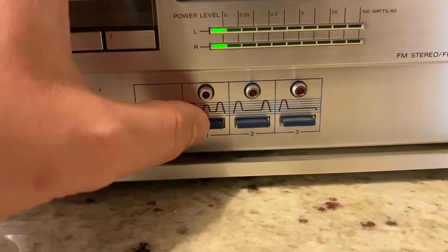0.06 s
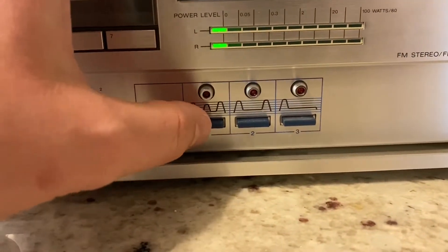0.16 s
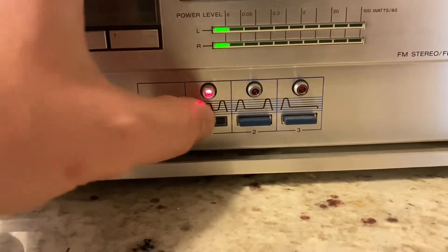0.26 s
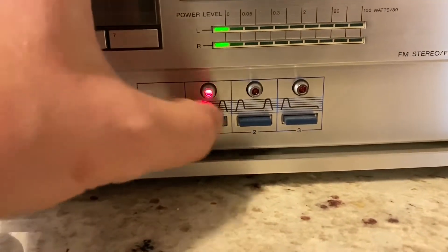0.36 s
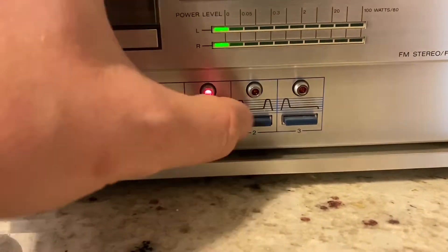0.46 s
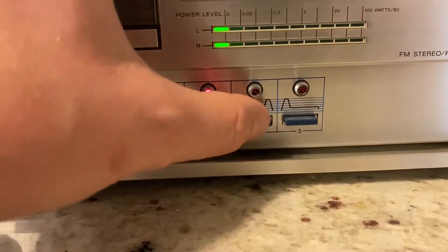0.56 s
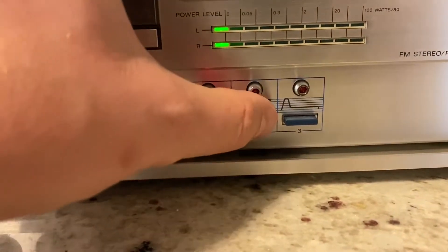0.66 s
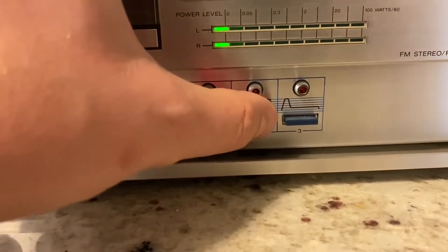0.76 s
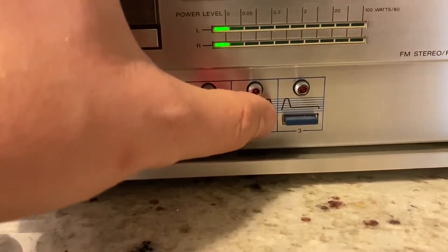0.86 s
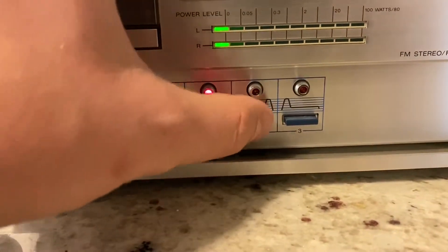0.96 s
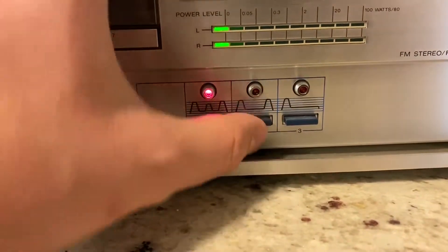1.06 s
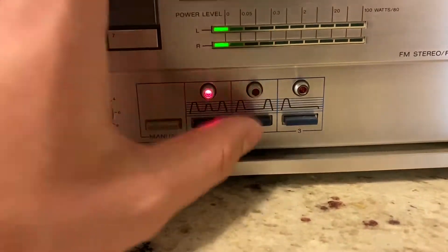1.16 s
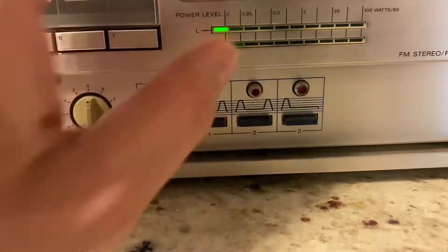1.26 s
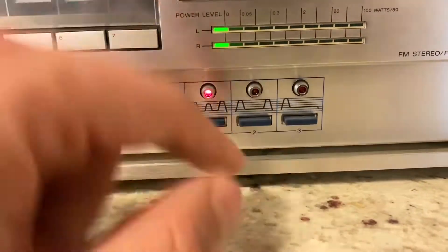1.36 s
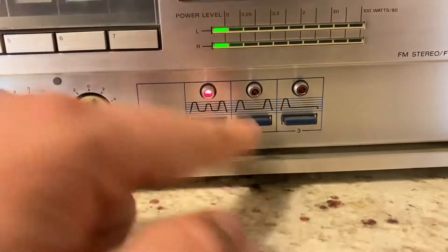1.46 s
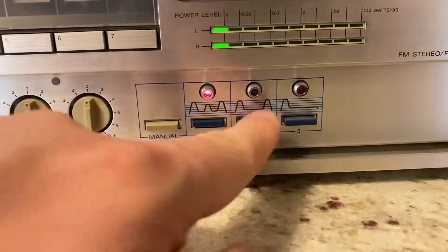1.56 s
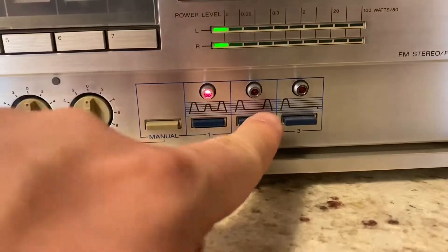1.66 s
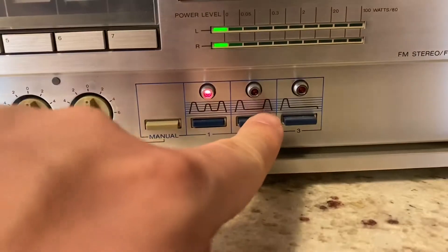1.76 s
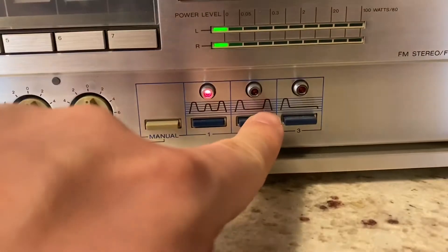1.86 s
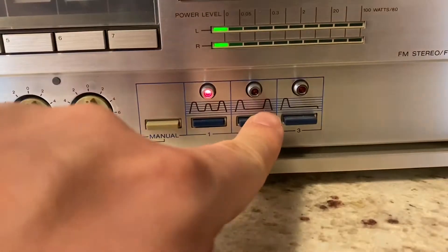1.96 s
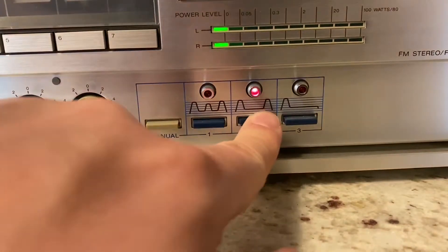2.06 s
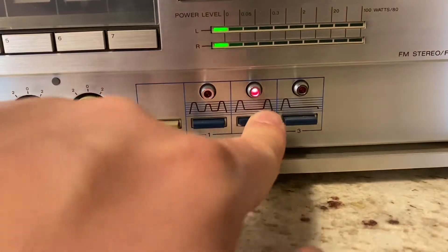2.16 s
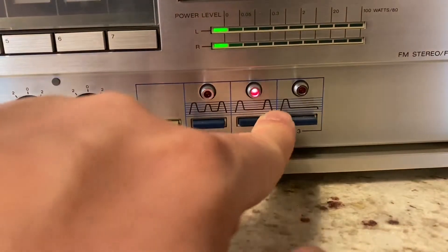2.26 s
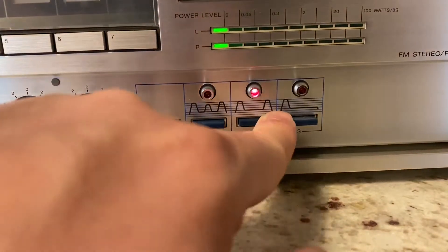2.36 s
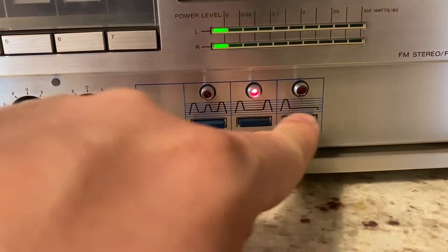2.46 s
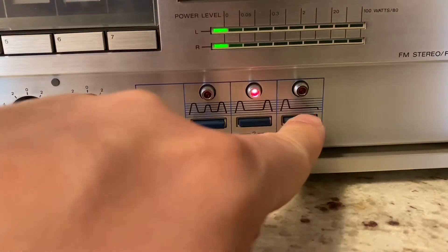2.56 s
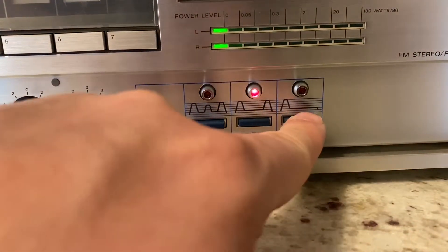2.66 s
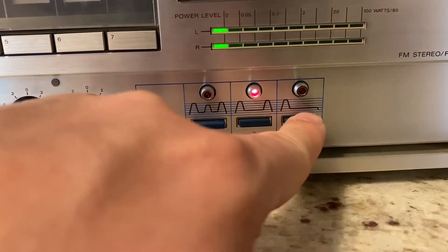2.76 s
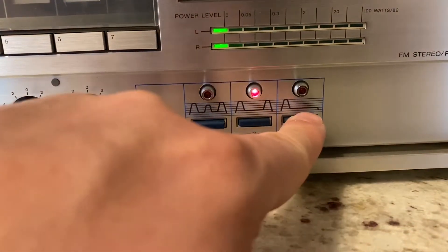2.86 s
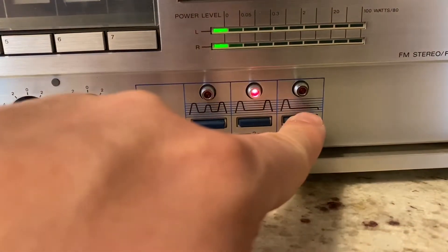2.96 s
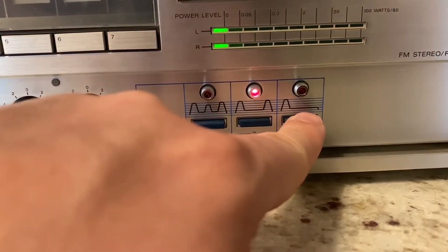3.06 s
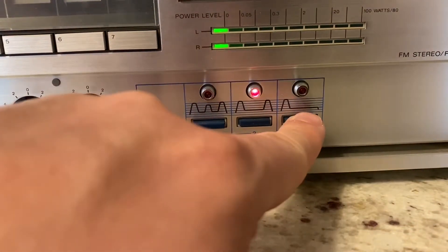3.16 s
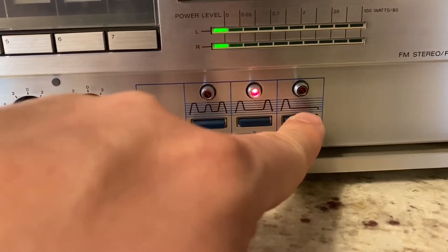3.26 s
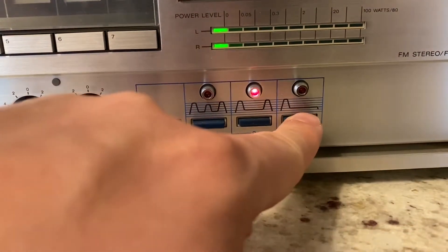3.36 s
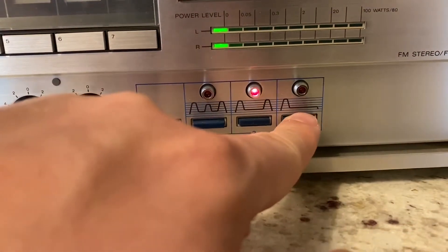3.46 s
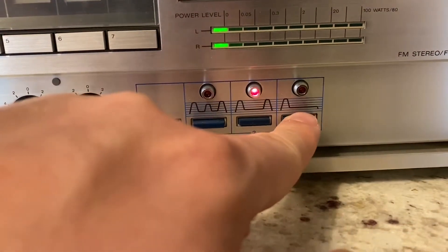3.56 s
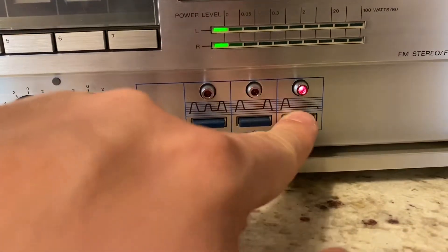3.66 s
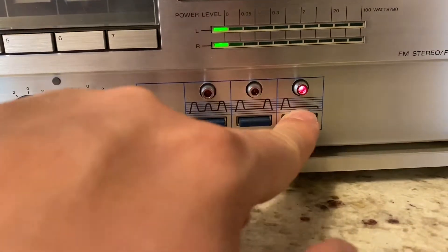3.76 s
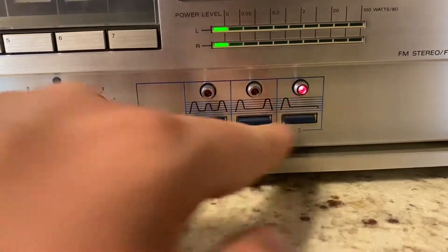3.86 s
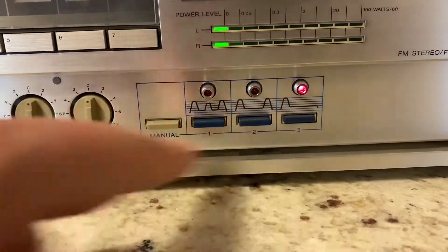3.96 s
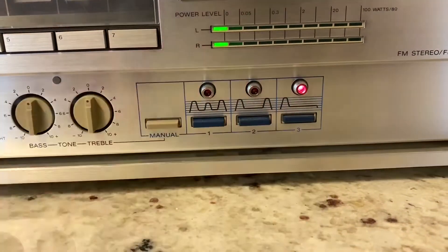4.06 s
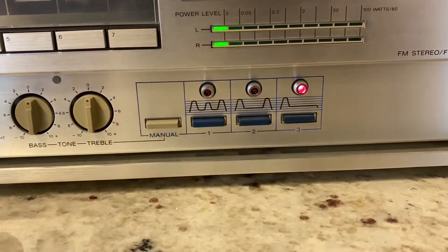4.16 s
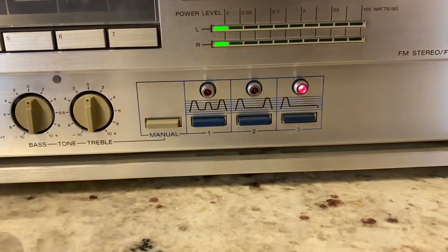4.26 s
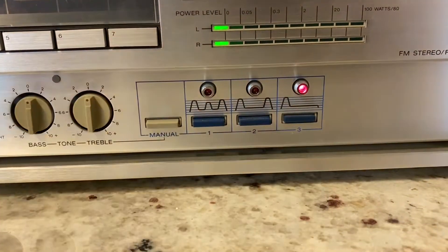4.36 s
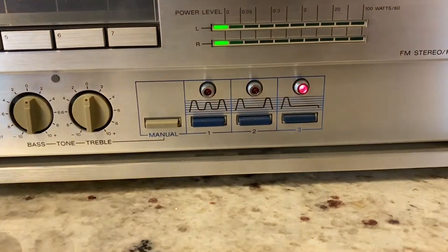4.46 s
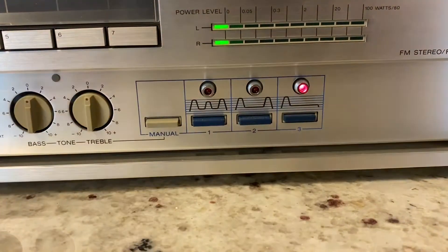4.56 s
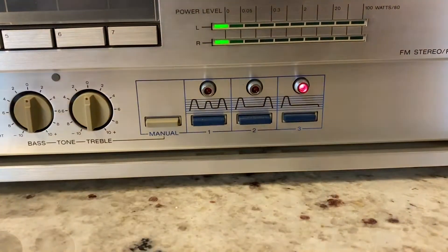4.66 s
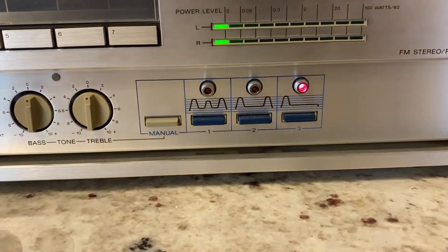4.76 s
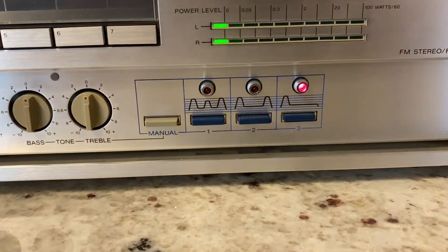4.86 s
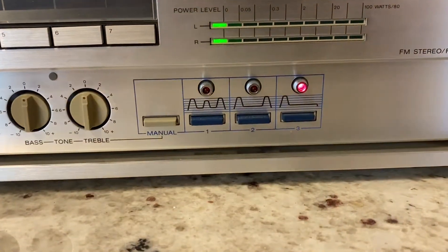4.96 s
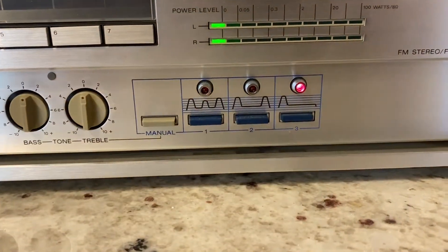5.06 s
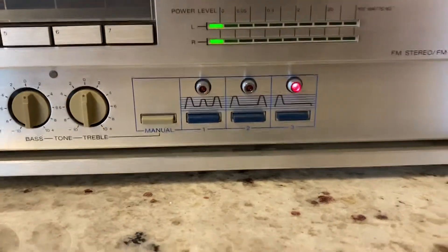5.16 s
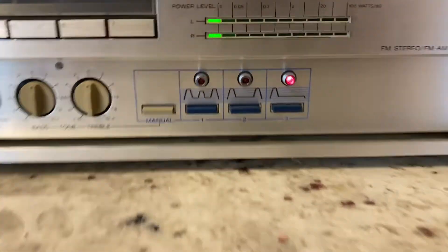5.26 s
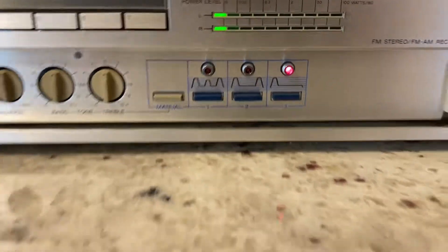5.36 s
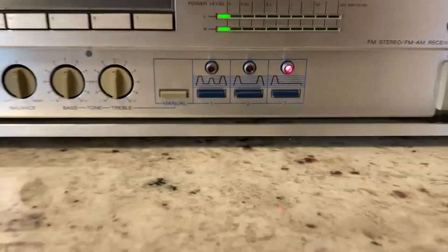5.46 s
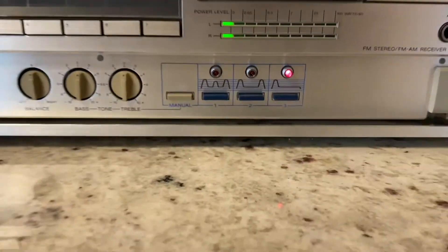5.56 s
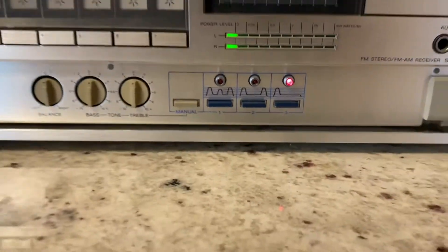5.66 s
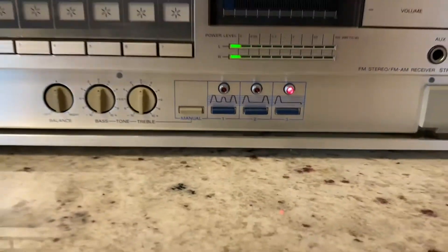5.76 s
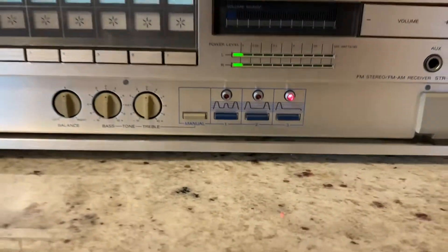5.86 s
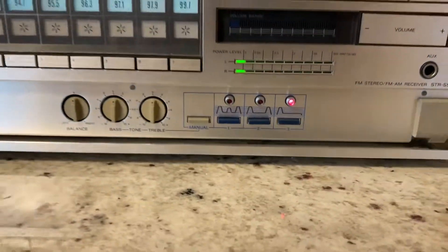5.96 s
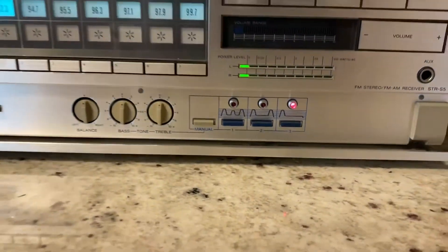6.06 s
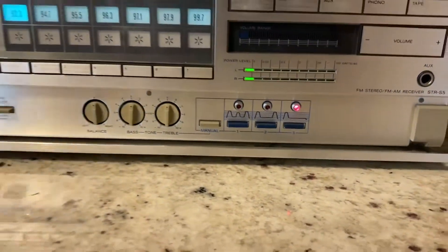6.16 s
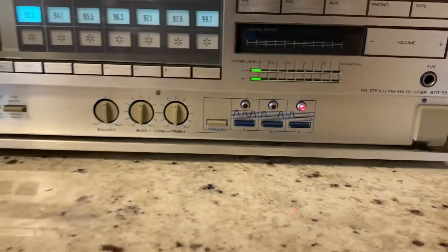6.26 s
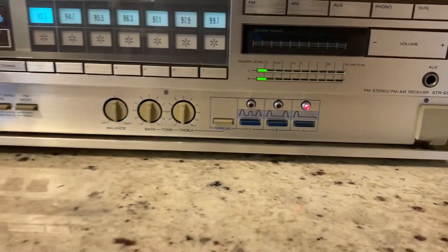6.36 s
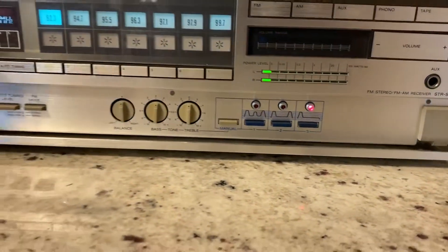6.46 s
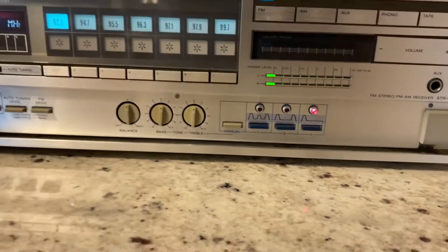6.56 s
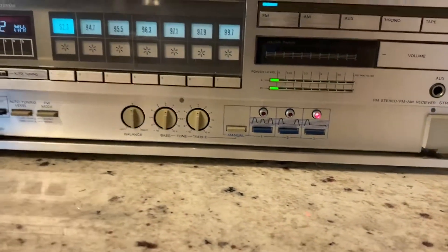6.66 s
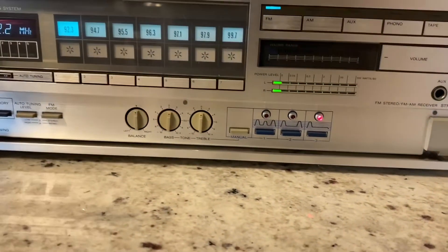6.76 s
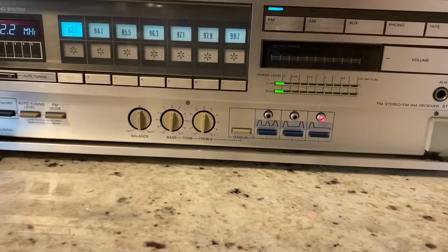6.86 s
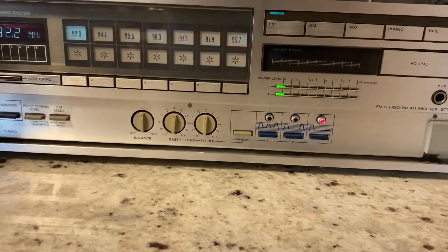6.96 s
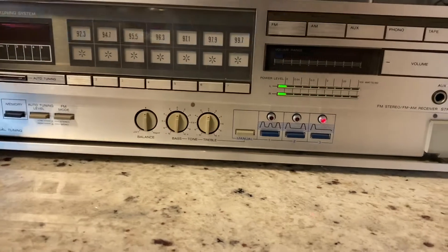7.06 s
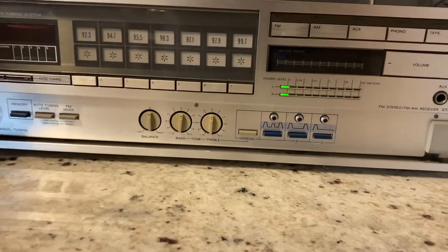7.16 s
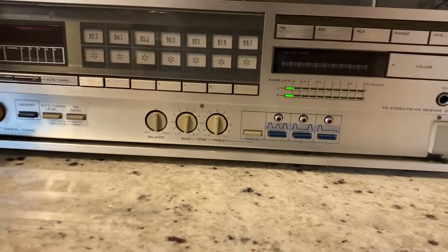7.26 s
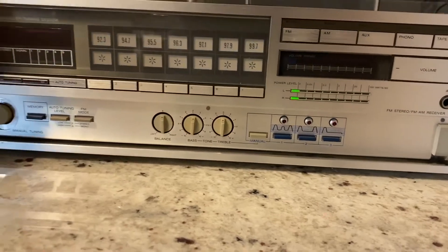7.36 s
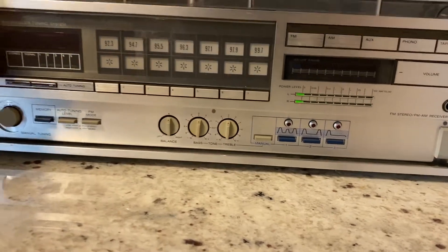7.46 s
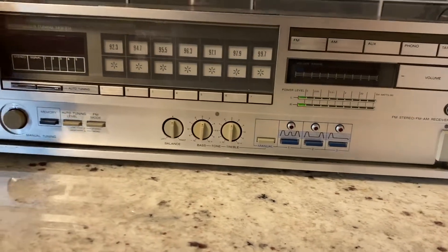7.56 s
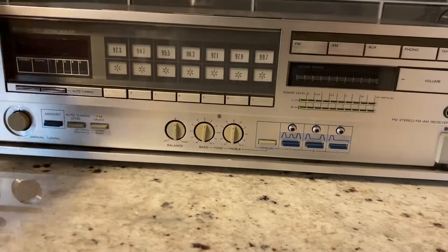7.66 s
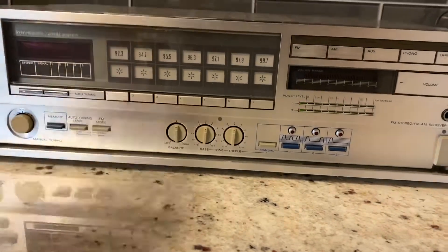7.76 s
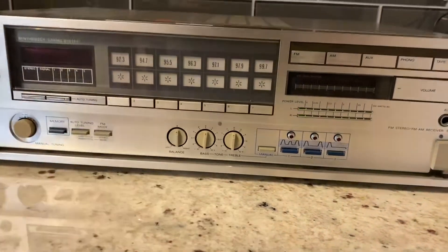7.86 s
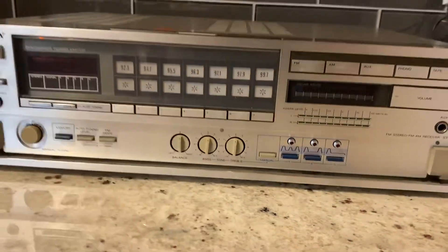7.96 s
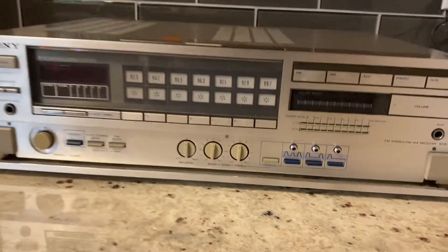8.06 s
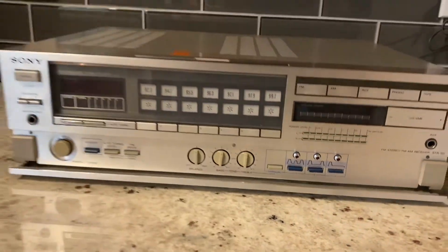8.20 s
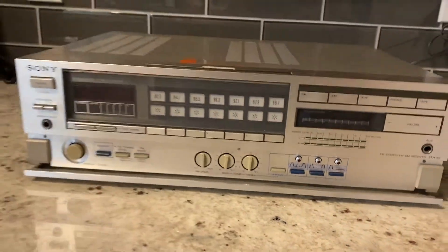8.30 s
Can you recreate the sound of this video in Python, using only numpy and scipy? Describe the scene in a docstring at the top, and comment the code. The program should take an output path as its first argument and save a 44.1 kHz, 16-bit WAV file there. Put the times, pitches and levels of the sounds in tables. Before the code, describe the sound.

Three loud, sharp latching button clicks on a metal panel in a quiet, hard kitchen, then a heavier power-switch clunk, with faint finger rustles.

```python
"""A quiet, hard kitchen: buttons on the metal front of a receiver are pressed, heard from a hand-held stereo microphone.
Latches, a power switch and small finger ticks are short noise bursts that set sine-like modes ringing;
decaying noise bands make the room's echoes. Skin and sleeve rustle as flickering noise and squeak as
resonances fed by random slips. The grip thumps softly, over a low rumble, room air and faint hiss."""
import sys
import numpy as np
from scipy import signal
from scipy.fft import rfft, irfft
from scipy.io import wavfile

SR = 44100
rng = np.random.default_rng(int(sys.argv[2]) if len(sys.argv) > 2 else 0)


def store_pcm(level_fs):
    """Save levels as 16-bit WAV."""
    pcm = np.round(np.clip(level_fs, -1, 1) * 32767).astype(np.int16)
    wavfile.write(sys.argv[1], SR, np.atleast_2d(pcm).T)


N = 367353  # length [samples]
TRAVEL_S = 0.02  # time kept ahead of each snap for the scrape of the cap [s]

# how alike left and right are in the background: (frequency [Hz], likeness [-1 to 1])
BACKGROUND_LIKENESS = [(30, 0.92), (70, .9), (150, 0.8), (400, .5), (1650, -0.76), (5000, .5),
                       (15000, 0.35)]
# balance of the rumble and air: (frequency [Hz], left minus right [dB])
BACKGROUND_BALANCE = [(60, -0.5), (240, 4), (950, 1.5), (3770, 3), (15000, -1)]


def from_db(db):
    """Turn decibels into a plain gain."""
    return 10 ** (np.asarray(db) / 20)


def rms_one(x):
    """Scale a sound to an average (rms) strength of 1."""
    return x / np.sqrt(np.mean(x ** 2) + 1e-20)


def in_time(rows):
    """Draw straight lines between timed rows, giving one curve per column."""
    s, *columns = np.transpose(rows)
    return [np.interp(np.arange(N) / SR, s, column) for column in columns]


def at_hz(points, hz):
    """Read a curve at any frequency, with straight lines on a log frequency scale."""
    point_hz, values = np.array(points)[:, 0], np.array(points)[:, 1]
    return np.interp(np.log(hz), np.log(point_hz), values)


def fft_hz(size):
    """Frequencies of a spectrum, kept at 1 Hz or more so their logarithm exists."""
    return np.maximum(np.fft.rfftfreq(size, 1 / SR), 1)


def drift(rate_hz):
    """Slow random wander, spread 1: noise through two equal low-pass steps at the given rate."""
    r = np.exp(-80 * np.pi * rate_hz / SR)  # one slow step lasts 40 samples
    noise = rng.standard_normal(N // 40 + 2002)
    slow = signal.lfilter([1], [1, -2 * r, r * r], noise)[2000:]
    return np.interp(np.arange(N) / 40, np.arange(len(slow)), rms_one(slow))


def ring(clicks, hz, t60, phase=0.):
    """A unit click sets a sine of height 1 ringing from the given phase, 60 dB weaker after t60 seconds."""
    r, w = from_db(-60 / (t60 * SR)), 2 * np.pi * hz / SR
    start = [np.sin(phase), r * np.sin(w - phase)]
    return signal.lfilter(start, [1, -2 * r * np.cos(w), r * r], clicks + 1e-18)


def coloured(spectrum, likeness, side_db=((20, 0), (20000, 0))):
    """Stereo noise of a given spectrum, left-right likeness and balance; rms 1."""
    hz = fft_hz(N)
    mid, side = rfft(rng.standard_normal((2, N)))
    alike = np.clip(at_hz(likeness, hz), -1, 1)
    pair = np.sqrt(1 + alike) * mid + np.sqrt(1 - alike) * side * [[1], [-1]]
    inside = (hz >= spectrum[0][0]) & (hz <= spectrum[-1][0])
    gain_db = at_hz(spectrum, hz) + at_hz(side_db, hz) * [[.5], [-.5]]
    return rms_one(irfft(pair * inside * from_db(gain_db), N))


def low_rumble():
    """Deep noise swells as the grip moves."""
    # strength of the rumble: (time [s], level [dB])
    rumble_level = [(0.0, -62.5), (0.37, -57.5), (0.6, -66), (1.14, -57.5), (1.23, -69), (1.37, -50.5),
                    (1.44, -62.5), (3.32, -65), (3.67, -56.5), (3.87, -63), (4.96, -64), (5.06, -56),
                    (5.68, -67), (6.94, -59), (7.38, -72), (8.33, -71.5)]
    # its colour: (frequency [Hz], relative level [dB per Hz])
    bass = [(12, -44.5), (20, -19.5), (36, -10.5), (54, 1.5), (86, -5), (119, -0.5), (150, -14), (205, -14),
            (220, -12), (290, -38.5), (480, -120)]
    return from_db(in_time(rumble_level)[0]) * coloured(bass, BACKGROUND_LIKENESS, BACKGROUND_BALANCE)


def room_air():
    """Steady room noise wavers slightly and sinks once the power is off, then recovers."""
    # strength before the wavering: (time [s], level [dB])
    air_level = [(0, -71.5), (6, -72), (7.1, -67.5), (7.35, -78), (8.33, -71)]
    # its colour: (frequency [Hz], relative level [dB per Hz])
    air = [(88, -34), (150, -8), (352, -8.5), (387, -16), (647, -18.5), (685, -20.5), (1000, -23),
           (1670, -28), (1980, -30), (5630, -42.5), (14000, -49.5)]
    level_db = in_time(air_level)[0] + 1.2 * drift(11.0)
    return from_db(level_db) * coloured(air, BACKGROUND_LIKENESS, BACKGROUND_BALANCE)


def patchy(x):
    """Half-octave bands swell and sink each in their own time."""
    spread_db, rate_hz = 3.5, 8.3
    spectrum, out = rfft(x), 0
    steps = np.clip(2 * np.log2(fft_hz(N) / 500), 0, 10)  # half octaves above 500 Hz
    for k in range(11):
        share = np.clip(1 - np.abs(steps - k), 0, 1)
        out = out + from_db(spread_db * drift(rate_hz)) * irfft(spectrum * share, N)
    return out


def rustle():
    """Skin and cloth slide in uneven, grainy strokes: a bright hiss over a duller rub."""
    # strokes, before they flicker: (time [s], length [s], bright hiss [dB], dull rub [dB])
    strokes = [(0.106, 0.065, -96, -68), (0.273, 0.05, -81, -56), (0.527, 0.073, -94.5, -78),
               (0.905, 0.12, -71.5, -67.5), (0.949, 0.19, -68, -61.5), (1.085, 0.25, -74.5, -81),
               (1.278, 0.14, -60.5, -69), (1.332, 0.26, -79.5, -93), (1.927, .03, -98.5, -62),
               (2.293, 0.16, -88, -70), (3.571, 0.039, -92, -60.5), (3.733, 0.29, -58.5, -70),
               (3.97, 0.23, -59, -73), (4.35, 0.064, -74.5, -85), (4.896, 0.18, -80.5, -83.5),
               (5.015, 0.21, -68.5, -74), (5.244, 0.15, -72.5, -82), (5.438, 0.23, -70.5, -74),
               (6.456, 0.1, -70.5, -99.5), (6.754, 0.11, -70, -67), (7.494, 0.078, -70, -75.5),
               (8.116, 0.056, -80.5, -69.5), (8.152, 0.13, -92.5, -80.5)]
    # colour of the bright hiss: (frequency [Hz], relative level [dB per Hz])
    hiss_colour = [(2000, -20), (4000, -7.5), (7500, -5.5), (11000, 3), (13000, -1), (16000, -1)]
    # colour of the dull rub: (frequency [Hz], relative level [dB per Hz])
    rub_colour = [(150, -13.5), (300, 4.5), (500, -2), (850, -5), (1150, -11), (1600, -13), (2200, -4),
                  (3900, -15), (6900, -11), (9000, -65.5)]
    gains = np.zeros((2, N))
    for s, length, hiss_db, rub_db in strokes:
        size, at = round(length * SR), round(s * SR)
        stroke = from_db([[hiss_db], [rub_db]]) * signal.windows.tukey(size, .75)
        gains[:, at:at + size] += stroke[:, :N - at]
    hiss = gains[0] * coloured(hiss_colour, [(4000, 0.9), (16000, -.2)])
    rub = gains[1] * coloured(rub_colour, [(200, 0.55), (9000, 0.25)])
    grain = from_db(0.7 * drift(60) + 1.2 * drift(24))
    return grain * patchy(hiss + rub)


def crack(lows_db, mids_db, treble_db, decay_ms, size):
    """The cap scrapes in, the latch lets go: a contact, a dense dry burst, then a fainter, slower rattle; close and far."""
    # shared colour of the snaps: (frequency [Hz], relative level [dB per Hz])
    crack_colour = [(100, -43.5), (200, -20), (400, -8), (900, -12.5), (1400, -8), (2500, -11),
                    (4500, -4.5), (6000, -10), (8000, -24.5), (11000, -20), (16000, -29)]
    hz = fft_hz(size)
    t_ms = (np.arange(size) / SR - TRAVEL_S) * 1000
    after = np.maximum(t_ms, 0)  # time since the snap [ms]
    tilt_db = at_hz([(500, lows_db + 15.0), (900, 0.011), (2500, 0.0022), (3500, mids_db + 6.0),
                     (6000, mids_db + 6.5), (8000, treble_db + 19.0)], hz)
    colour = from_db(at_hz(crack_colour, hz) + tilt_db)

    dying = np.exp(-after / max(decay_ms, .3)) + 0.25 * np.exp(-after / 0.41)
    swell = (1 - np.exp(-after / .5)) * dying
    noise = irfft(rfft(rng.standard_normal(size)) * colour, size)
    noise *= np.sqrt(np.sum(swell ** 2) / np.sum((noise * swell) ** 2)) / 2

    dull = irfft(rfft(noise) / (1 + (hz / 4000) ** 2), size)
    scrape = dull * 0.15 * np.exp(-np.abs(t_ms) / 5.9)  # swells up to the snap, then dies
    softer = irfft(rfft(noise) / (1 + (hz / 8000) ** 4), size)
    rattle = softer * (t_ms > 0) * 0.093 * np.exp(-after / max(11.0 * decay_ms, 1))
    without_lows = colour * hz ** 2 / (hz ** 2 + 1500 ** 2)
    contact = irfft(without_lows * np.exp(-2j * np.pi * hz * (TRAVEL_S + .0008)), size)  # one click, 0.8 ms late
    burst = noise * swell + scrape + rattle + 0.74 * contact / contact.max()

    # the room answers a plain click with the burst's smooth colour and equal energy
    far = irfft(colour * np.exp(-2j * np.pi * hz * TRAVEL_S), size)
    return burst, far * np.sqrt(np.sum(burst ** 2) / np.sum(far ** 2))


def strike(events, modes, treble_under_db, ring_db, decay_ms, room_db, ring_share):
    """Every snap cracks and rings the given modes; returns the close sound and what goes to the room."""
    near, sent, size = np.zeros(N), np.zeros(N), 3 * SR // 4
    for s, level_db, lows_db, bright_db in events:
        burst, far = crack(lows_db, bright_db, bright_db - treble_under_db, decay_ms, size)
        push, rings = np.zeros(size), 0
        push[round((TRAVEL_S + .0006) * SR)] = 1
        for hz, mode_db, t60 in modes:
            mode_db += lows_db + 15.0 if hz < 700 else ring_db
            phase = rng.uniform(0, 2 * np.pi)
            rings = rings + from_db(mode_db - 9.0) * ring(push, hz, t60 * ring_share, phase)
        at = round((s - TRAVEL_S) * SR)
        near[at:at + size] += from_db(level_db) * (burst + rings)[:N - at]
        # only part of the panel's ring reaches the room
        sent[at:at + size] += from_db(level_db + room_db) * (far + 0.74 * rings)[:N - at]
    return np.array([near, sent])


def buttons():
    """Contacts ring the metal; two close microphone ports hear them, and a copy is sent to the room."""
    # Each list of contacts: (time [s], level [dB], lows [dB], brightness [dB]), the last two relative.
    # fingers touch and leave the preset buttons
    ticks = [(0.1421, -42, -15, 6), (0.8724, -63, -13.5, -26), (0.9662, -41, -6.5, -13),
             (1.6441, -50, -22, -15.5), (2.134, -30, -25.5, -6.5), (2.161, -41.5, -22.5, -21.5),
             (2.2095, -62, 3, -15.5), (2.3143, -48.5, -17, -48.5), (3.3137, -59.5, -11.5, -15),
             (3.563, -47.5, -10, -16.5), (3.7399, -34, -21.5, -16), (4.372, -63, -8.5, -25),
             (4.9887, -72, -7, -2.5), (5.0456, -56.5, -0.5, -13), (5.108, -59.5, -24, -8.5),
             (5.7987, -68, -15.5, -8), (8.2049, -62.5, 1.5, -24)]
    # preset latches letting go
    latches = [(0.158, -12, -21.5, -7.5), (1.952, -13.5, -19, -8), (3.6036, -13, -17.5, -8)]
    # finger working the power switch in
    presses = [(6.656, -48.5, -24, -15.5), (6.6644, -40, -21, -18), (6.6959, -42.5, -34, -14.5),
               (6.783, -49, -9, -35), (6.797, -49, -16, -16)]
    # power switch going over and landing
    clunks = [(6.8251, -16, -33, -9.5), (6.8538, -22, -19.5, -21), (6.866, -29, -23, -15.5),
              (6.878, -32.5, -20, -13)]
    # Modes, ring times before each kind's factor: (frequency [Hz], relative level [dB], 60 dB ring time [s])
    # front panel
    panel = [(323, -4.5, 0.041), (358.7, -10.5, 0.31), (388, -13, .2), (500, -3.5, .06), (848, -7, 0.081),
             (1195, -5.5, 0.11), (1297, 4, 0.075), (1660, -11, 0.043), (2166, -8, 0.07), (2466, -9, 0.09),
             (4040, -2, 0.048), (4347, -5.5, 0.018), (5380, 0.5, 0.037), (10870, -15, .025)]
    # power switch
    switch = [(344, -15, .15), (364, -13, 0.17), (830, -7, 0.061), (1200, -1, 0.08), (1504, 3, 0.061),
              (1681, 3, 0.078), (1940, -5.5, 0.094), (1950, -28.5, 0.91), (1990, -30.5, 0.71),
              (2560, -1, 0.056), (4780, -2, 0.046), (6900, 5.5, 0.015)]
    # Kinds of contact: (treble under the bright mids [dB], ring [dB], decay [ms], room [dB], ring time factor)
    # latch letting go
    latch = (9.5, -3, 6.5, -12, 1.1)
    # finger tick
    tick = (8.5, -10, 5.5, -10.5, 1.04)
    # power switch landing
    clunk = (1.5, -10, 7.5, -11, 1.58)
    # finger on the power switch
    press = (12.5, -8.5, 13.5, -10, 1.6)
    # balance at the ports: (frequency [Hz], left minus right [dB])
    panel_balance = [(60, -0.5), (110, 2.5), (200, 3.5), (380, 1), (700, 0.5), (1290, -5), (2380, 0),
                     (4400, 4.5), (8120, 1.5), (15000, 0.5)]
    # timing at the ports: (frequency [Hz], phase by which left leads [radians])
    panel_lead = [(60, .3), (250, .6), (600, .8), (1300, 1.15), (2200, .9), (3500, -.9), (7300, -1.3),
                  (10500, -1.8), (16000, -2.1)]
    near, sent = (strike(ticks, panel, *tick) + strike(latches, panel, *latch)
                  + strike(presses, switch, *press) + strike(clunks, switch, *clunk))
    hz, half = fft_hz(N), np.array([[.5], [-.5]])
    ports = from_db(at_hz(panel_balance, hz) * half) * np.exp(1j * at_hz(panel_lead, hz) * half)
    return irfft(rfft(near) * ports, N), sent


def kitchen(x):
    """Dense echoes: octave bands of noise dying at their own rate, the lows shared by the two sides."""
    # how long echoes last: (frequency [Hz], time to fall 60 dB [s])
    room_t60 = [(200, .45), (500, .43), (1200, .47), (3000, .5), (6000, .45), (12000, .23)]
    # colour of the echoes: (frequency [Hz], relative level [dB])
    room_colour = [(200, -7.5), (500, 8), (1200, 3), (3000, -1.5), (6000, -1.5), (12000, 4)]
    # how alike the two sides are: (frequency [Hz], likeness [0 to 1])
    room_likeness = [(200, 1), (700, 0.88), (2000, 0.034), (8000, 0.18)]
    t = np.arange(SR) / SR
    shared, own = rng.standard_normal(SR), rng.standard_normal((2, SR))
    echo = 0
    for low in 140 * 2. ** np.arange(7):
        hz = low * np.sqrt(2)  # middle of the octave
        alike = np.clip(at_hz(room_likeness, hz), 0, 1)
        white = np.sqrt(alike) * shared + np.sqrt(1 - alike) * own
        octave = signal.butter(2, [low, 2 * low], "band", fs=SR, output="sos")
        fade_db = at_hz(room_colour, hz) - 60 * t / at_hz(room_t60, hz)
        echo = echo + signal.sosfilt(octave, white) * from_db(fade_db)
    echo = echo * np.clip(t / 0.0053, 0, 1)  # the first walls answer after a few ms
    echo = echo / np.sqrt(np.sum(echo ** 2) / 2)
    return signal.fftconvolve(x[None], echo, axes=1)[:, :N]


def creaks():
    """Skin drags and squeaks: dense uneven slips, each ringing one resonance."""
    slips_per_s = 2200
    # squeaks, level before the fade: (time [s], length [s], pitch [Hz], width [Hz], level [dB])
    squeaks = [(0.921, 0.14, 1135, 147, -57), (0.928, 0.081, 6660, 600, -61), (0.965, .12, 2300, 250, -90),
               (0.978, 0.068, 3800, 200, -69.5), (1.082, 0.049, 3840, 149, -66),
               (1.073, 0.055, 10600, 200, -64), (1.216, 0.037, 5000, 705, -73),
               (2.333, 0.07, 2170, 250, -71), (4.034, 0.21, 2900, 1770, -74.5),
               (4.973, 0.045, 2250, 150, -72), (4.983, 0.018, 4700, 150, -84.5),
               (4.986, .012, 12100, 3000, -61), (5.096, 0.1, 2110, 110, -71),
               (5.255, 0.12, 1900, 70, -76.5), (5.427, 0.059, 1760, 200, -73.5),
               (5.423, 0.056, 4600, 500, -78), (5.486, 0.11, 2250, 300, -80),
               (5.492, 0.096, 7200, 400, -73.5)]
    out = np.zeros(N)
    for s, length, hz, width_hz, level_db in squeaks:
        size, at = round(length * SR), round(s * SR)
        slips = (rng.random(SR // 4) < slips_per_s / SR) * rng.standard_normal(SR // 4)
        t60 = np.log(1000) / (np.pi * width_hz)  # a narrow resonance rings longer
        sound = rms_one(ring(slips, hz, t60)[:size])
        out[at:at + size] += from_db(level_db) * sound * np.sqrt(np.hanning(size))
    return out


def thumps():
    """The grip shifts: soft pushes set the microphone body swinging at a low pitch."""
    cycles = 10  # swings in which each of the two rings falls 60 dB
    # grip thumps: (time [s], relative level [dB], pitch [Hz])
    grip_thumps = [(0.998, -48.5, 104), (1.089, -42.5, 56.8), (1.33, -46.5, 236), (1.345, -49.5, 80.7),
                   (1.97, -53, 59.35), (3.621, -45.5, 79.3), (5.048, -54.5, 109), (8.168, -65.5, 87)]
    out = np.zeros(N)
    for s, level_db, hz in grip_thumps:
        push, t60 = np.zeros(N), cycles / hz
        push[round(s * SR)] = from_db(level_db + 9.5) * np.log(1000) / (t60 * SR)
        out += ring(ring(push, hz, t60), hz, t60) * 2  # one ring feeds another: swells, then dies
    return out


def scene():
    """Add the buttons, their echoes, the hand noises and the background."""
    background = low_rumble() + room_air()
    strokes = rustle()
    direct, sent = buttons()
    # squeaks lean to the right, thumps slightly to the left
    grip = creaks() * from_db([[-1.5], [1.5]]) + thumps() * from_db([[.7], [-.7]])
    return direct + kitchen(sent) + strokes + grip + background


def record(dry):
    """The microphone adds its faint hiss; the top is cut steeply."""
    hiss_db, cutoff_hz = -91, 16800
    # colour of the microphone hiss: (frequency [Hz], relative level [dB per Hz])
    self_noise = [(700, -6), (2000, -2), (6000, -4.5), (12500, -9.5)]
    dry = dry + from_db(hiss_db) * coloured(self_noise, BACKGROUND_LIKENESS)
    return signal.sosfilt(signal.cheby2(14, 70, cutoff_hz, fs=SR, output="sos"), dry)


dry = scene()
out = record(dry)
store_pcm(out)
```